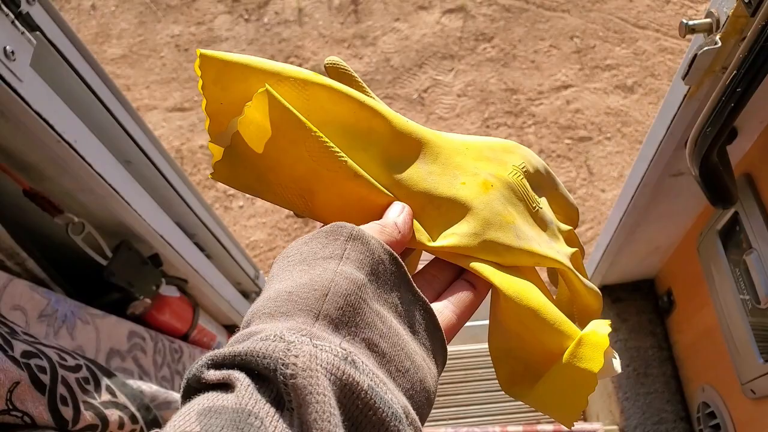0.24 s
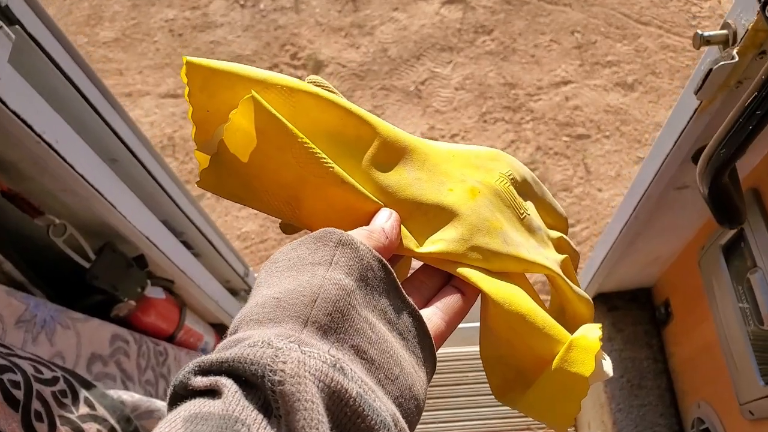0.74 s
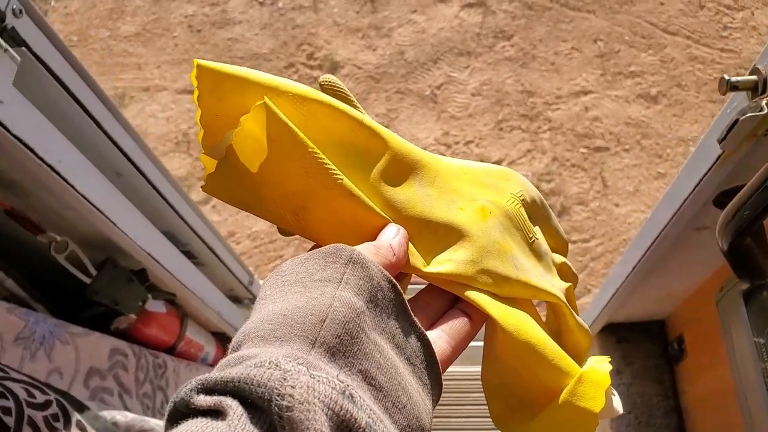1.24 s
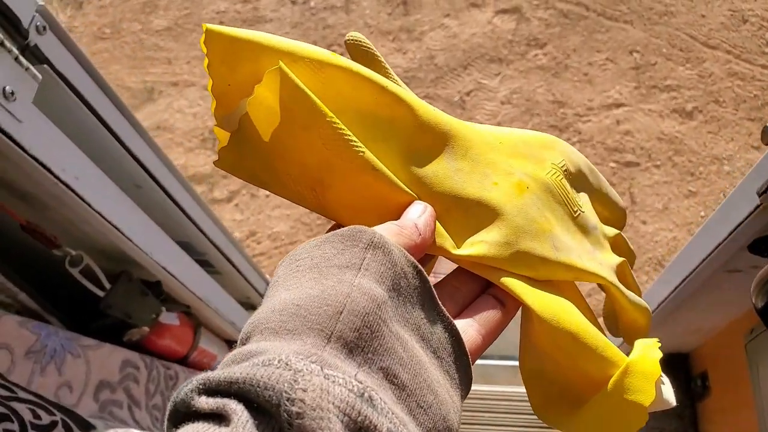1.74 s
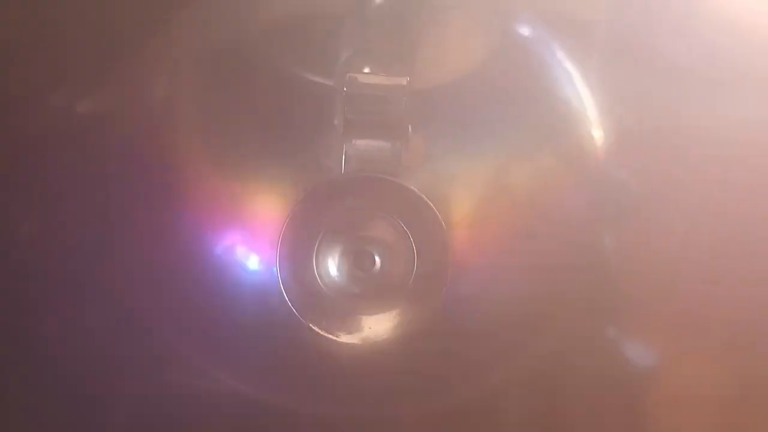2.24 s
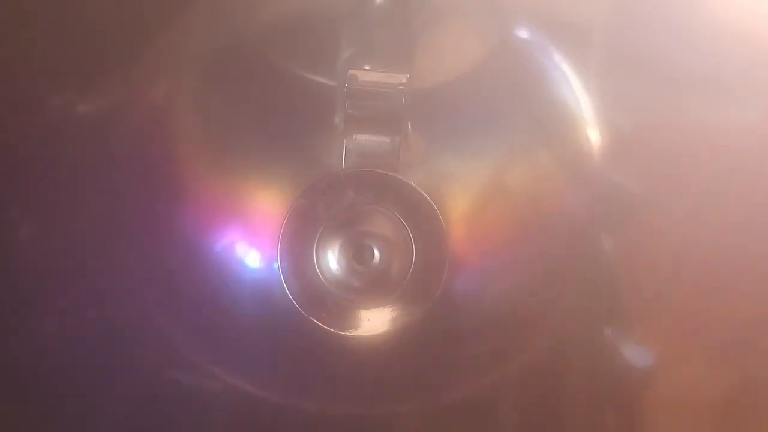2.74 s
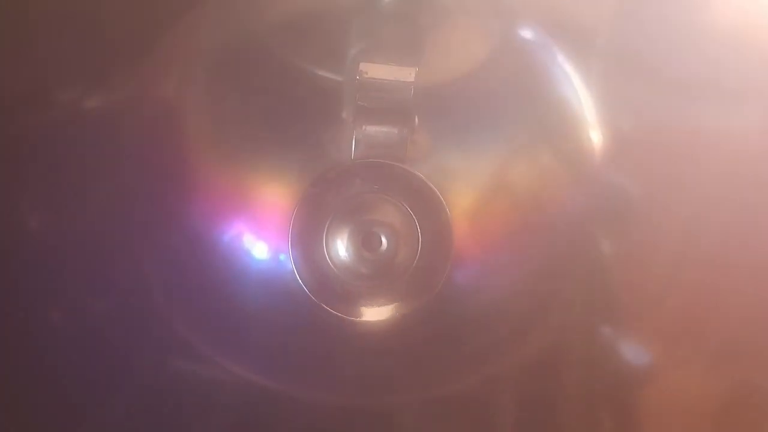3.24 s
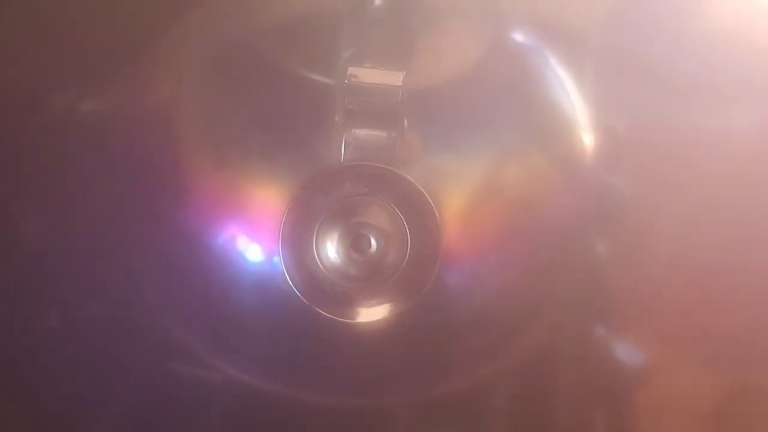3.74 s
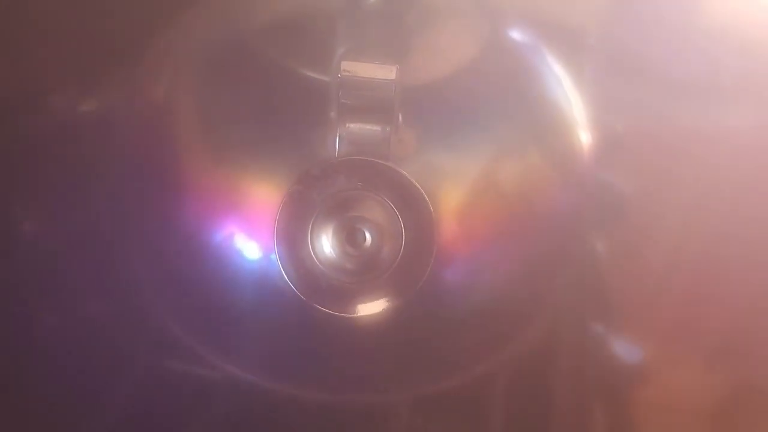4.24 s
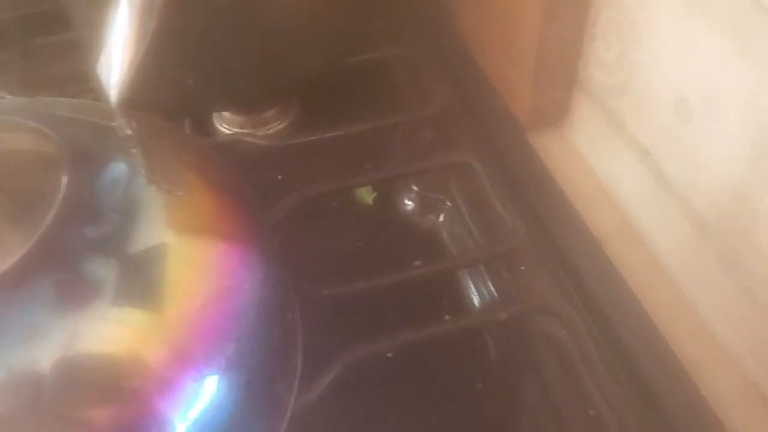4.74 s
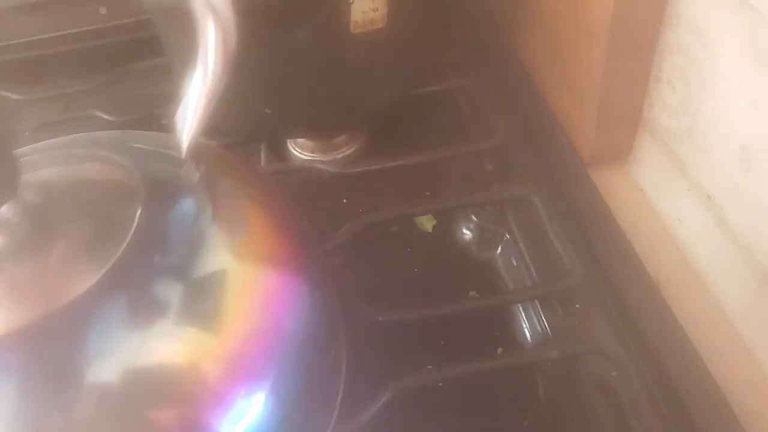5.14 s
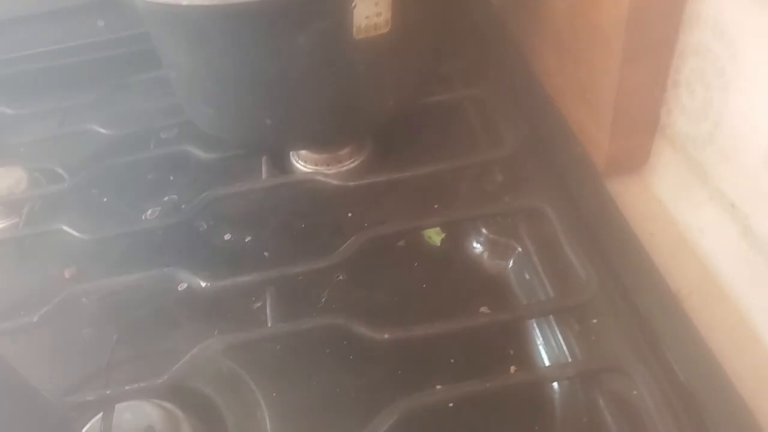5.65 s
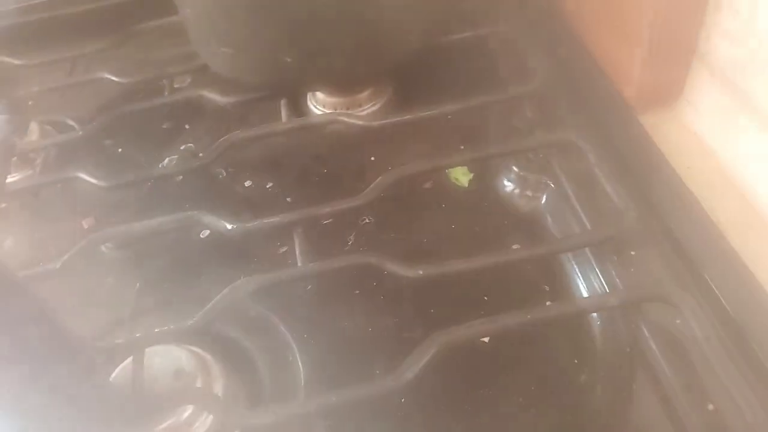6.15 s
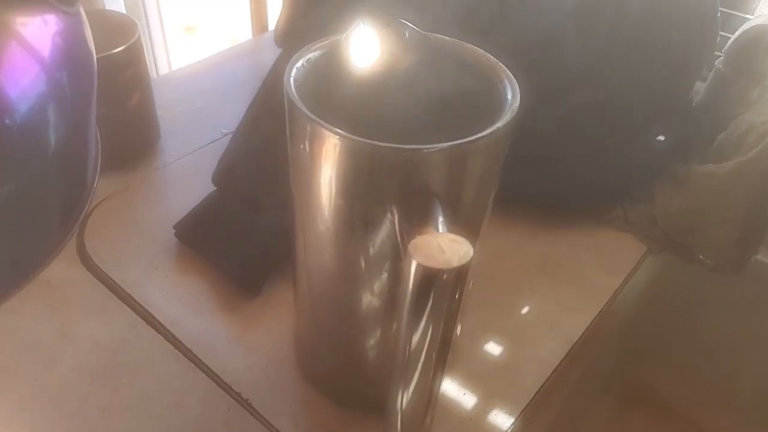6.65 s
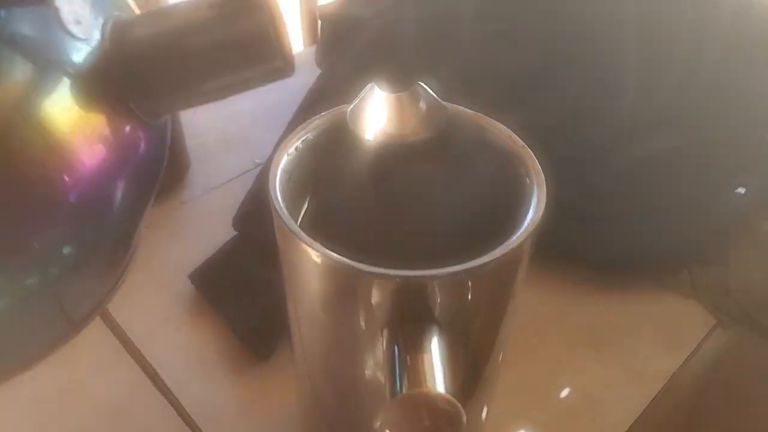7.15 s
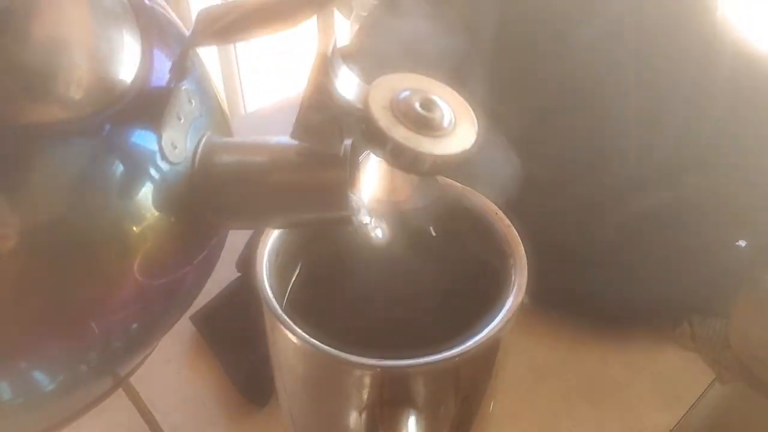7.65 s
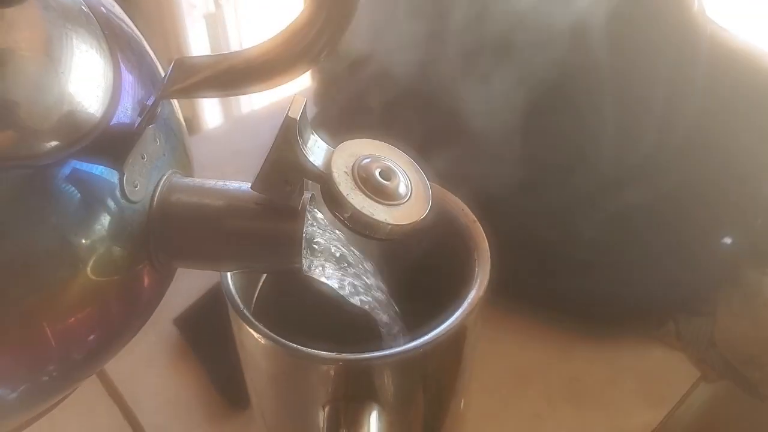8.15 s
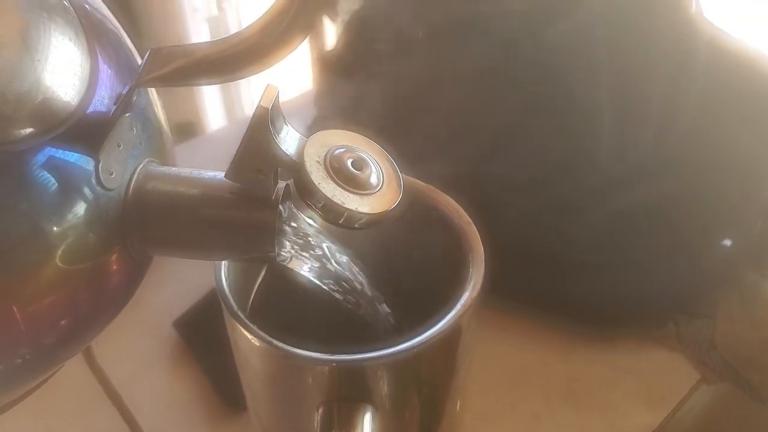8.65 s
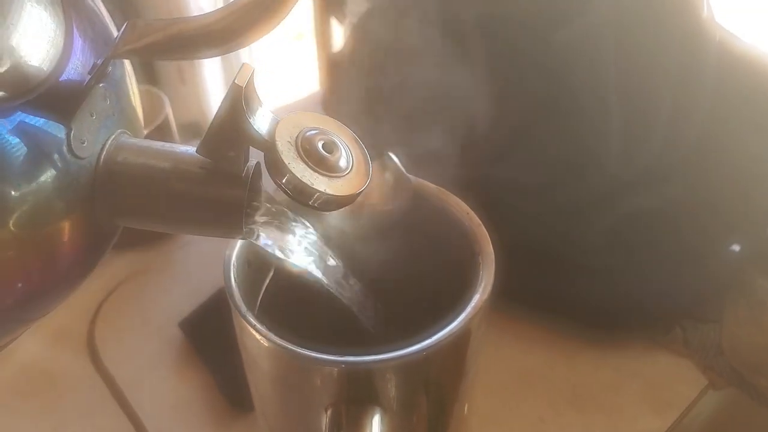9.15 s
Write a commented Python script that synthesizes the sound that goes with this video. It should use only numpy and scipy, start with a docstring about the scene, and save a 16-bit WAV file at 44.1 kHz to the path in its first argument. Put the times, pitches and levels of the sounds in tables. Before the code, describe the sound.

In a small camper kitchen, faint steam hisses over a low burner rumble, then a stovetop kettle whistles loudly, close to a stereo microphone. The bright note climbs slowly, cuts out for an instant, returns weak and drooping, then swoops as the kettle is lifted and water sloshes inside. The cap clacks, the spout hisses softly, and hot water plops into a steel mug slightly to the left, easing to a trickle.

```python
"""Faint steam hisses over a low rumble, then a kettle whistles, close to a stereo pair in a small camper kitchen.
On the gas ring, the steam jet's note climbs with the pressure, sags, then swoops as the kettle is lifted
and water sloshes on the hot metal. The cap clacks, the tipped spout hisses, and hot water plops into a
steel mug on the left. The sound breaks off twice for a moment, before and after the full whistle."""
import sys
import numpy as np
from scipy import signal
from scipy.fft import rfft, irfft, next_fast_len
from scipy.io import wavfile
from scipy.ndimage import uniform_filter1d

SR = 44100
rng = np.random.default_rng(int(sys.argv[2]) if len(sys.argv) > 2 else 0)


def store_wav(level_fs):
    """Save 16-bit WAV to argv[1]."""
    pcm = np.round(np.clip(np.atleast_2d(level_fs), -1, 1) * 32767)
    wavfile.write(sys.argv[1], SR, pcm.T.astype(np.int16))


N = 414981
T = np.arange(N) / SR
POUR_START_S = 7.95

# the whistle at full boil, climbing with the pressure: (time [s], pitch [Hz])
BOIL_PITCH = [(0.55, 2542), (0.58, 2480), (0.63, 2603), (0.83, 2599), (0.91, 2703), (1.5, 2706),
              (1.85, 2807), (2.23, 2790), (2.33, 2920), (2.94, 2992), (3.2, 3000), (3.23, 2994),
              (3.6, 3009), (4.01, 3037), (4.16, 3115), (4.42, 3068)]
# spectrum of steam rushing through the cap: (frequency [Hz], level [dB])
STEAM_HISS = [(500, -35.5), (1500, -30.5), (2400, -5.5), (4100, -5.5), (5000, 0.5), (6500, 0.5),
              (7800, -9.5), (9500, -4), (15500, -9.5)]


def amp(db):
    """Decibels to gain."""
    return 10 ** (np.asarray(db) / 20)


def unit(x):
    """Scale to rms 1."""
    return x / np.sqrt(np.mean(np.abs(x) ** 2))


def curves(table, fade=0.012):
    """A gate over the table's span, then each column at every sample."""
    s, *columns = np.transpose(table)
    gate = np.interp(T, [s[0] - fade, s[0], s[-1], s[-1] + fade], [0, 1, 1, 0])
    return [gate] + [np.interp(T, s, c) for c in columns]


def walk(rate):
    """Smooth random motion with spread 1 and about rate turns a second."""
    hold = max(int(SR / rate), 2)
    steps = np.repeat(rng.standard_normal(N // hold + 1), hold)
    return unit(uniform_filter1d(steps, hold)[:N])


def lift(x, centre, half_width, peak):
    """A bump that reaches its peak as x passes the centre."""
    return peak / (1 + ((x - centre) / half_width) ** 2)


def decay(t, t60):
    """Gain of a ring that loses 60 dB in t60."""
    return np.exp(-np.log(1000) * t / t60)


def place(events):
    """Lay (time, sound) pairs on one track."""
    out = np.zeros(N)
    for s, sound in events:
        i = int(s * SR)
        out[i:i + len(sound)] += sound[:N - i]
    return out


def pan(db):
    """Gains of the two microphones, the left louder by db."""
    return amp(np.array([[.5], [-.5]]) * db) / np.cosh(db * np.log(10) / 40)


def right_later(x, samples=8):
    """Sound from the left side reaches the right microphone a little later."""
    return np.array([x[0], np.roll(x[1], samples)])


def noise(alike=0.):
    """White noise at two microphones; alike is the share they have in common."""
    white = rng.standard_normal((3, N))
    return np.sqrt(alike) * white[2] + np.sqrt(1 - alike) * white[:2]


def filtered(x, response):
    """Pass x through a response given as a function of frequency."""
    size = next_fast_len(N + 8192, True)
    hz = np.fft.rfftfreq(size, 1 / SR) + .01
    return irfft(rfft(x, size) * response(hz), size)[..., :N]


def colour(x, points):
    """Shape x by (frequency [Hz], level [dB]) points, falling away beyond the ends; rms 1."""
    hz, db = np.transpose(points)

    def response(f):
        roll_off = 1 + (f / hz[-1] / 2) ** 2 + (hz[0] / f / 2) ** 2
        return amp(np.interp(np.log(f), np.log(hz), db)) / roll_off
    return unit(filtered(x, response))


def resonate(x, modes):
    """Ring x through (frequency [Hz], width [Hz], gain [dB]) resonances."""
    return filtered(x, lambda f: sum(amp(db) / (1 + 1j * (f * f - hz * hz) / (f * width))
                                     for hz, width, db in modes))


def cabin(x, wet_db, t60=0.099):
    """Direct sound plus the short dense echo of the camper's close walls."""
    t = T[:SR // 4]
    echo = rng.standard_normal((2, len(t))) * decay(t, t60) * (t > .002)
    echo /= np.sqrt(np.sum(echo ** 2, axis=1, keepdims=True))
    walls = signal.fftconvolve(x.mean(0)[None], echo, axes=1)[:, :N]
    return (x + amp(wet_db) * walls) / np.hypot(1, amp(wet_db))


def room_tone():
    """The kitchen's faint background air."""
    # (frequency [Hz], level [dB])
    spectrum = [(18, -38.5), (30, -16), (173, -2), (467, -18.5), (787, -8), (1550, -23), (5040, -14.5),
                (7460, -20.5), (15500, -25)]
    return colour(noise(alike=0.33), spectrum) * amp(-68)


def slow_steam(levels, spectrum, hiss_db, spout_db, rumble_db):
    """Steam hisses through the spout without locking to a tone, over a low rumble."""
    # resonances of the capped spout and of the gush past the open cap:
    # (frequency [Hz], width [Hz], gain [dB])
    spout_modes = [(1612, 103, -0.5), (2460, 200, -10.5), (2663, 56, 4.5), (2900, 68, -7), (3500, 45, -2)]
    gush_band = [(2780, 1940, 0)]
    # the burner's rumble: (frequency [Hz], level [dB])
    burner_spectrum = [(12, -47), (20, -18), (92, 2.5), (203, -19), (359, -28), (600, -38), (780, -76),
                       (1320, -120)]
    cap_opens_s, cap_swing_s = 7.38, .22
    gate, steam_db, low_db = curves(levels)
    hiss = colour(noise(alike=0.075), spectrum) * amp(steam_db + hiss_db + 0.78 * walk(37)) * pan(-1.5)
    opened = np.interp(T, [cap_opens_s, cap_opens_s + cap_swing_s], [0, 1])
    gush = resonate(noise(alike=0.21), gush_band)
    capped = unit(resonate(gush, spout_modes)) * amp(-8 * opened)
    uncapped = unit(resonate(gush, gush_band)) * opened
    spout = (capped + uncapped) * amp(steam_db + spout_db + 1.2 * walk(30)) * pan(7.9)
    rumble = colour(noise(alike=0.98), burner_spectrum) * amp(low_db + rumble_db)
    return gate * (hiss + spout + rumble)


def simmer():
    """On the ring, the steam is still too slow to whistle."""
    # (time [s], hiss [dB], rumble [dB])
    levels = [(0, -54, -45), (0.52, -54, -49)]
    return slow_steam(levels, STEAM_HISS, hiss_db=0, spout_db=2, rumble_db=-1.5)


def jet_phase(hz, jitter):
    """Phase of the jet's oscillation: its pitch turns smoothly, shaken fast and slow by turbulence."""
    turbulence = 1 + jitter * (walk(350) + .8 * walk(45))
    return 2 * np.pi * np.cumsum(uniform_filter1d(hz, size=600) * turbulence) / SR


def partial(phase, db, pan_db, lag, flutter_db, skirt_db):
    """A fluttering line with a noisy skirt, reaching the right microphone lag radians later."""
    skirt = amp(skirt_db) * (walk(700) + 1j * walk(700))
    mics = pan(pan_db) * np.exp(-1j * lag * np.array([[0], [1]]))
    line = amp(db + flutter_db * walk(70)) * (1 + skirt) * np.exp(1j * phase)
    return np.sqrt(2) * np.real(line * mics / np.abs(mics.mean(0)))


def overtones(phase, base_db):
    """Faint partials above the whistle's octave."""
    # (multiple of the pitch, level re base_db [dB], left minus right [dB])
    harmonics = [(3, -20, -18.5), (4, -28.5, -18), (5, -46.5, -2)]
    return np.sqrt(2) * sum(amp(base_db + db + 2 * walk(90)) * np.cos(k * phase) * pan(side_db)
                            for k, db, side_db in harmonics)


def subtones(phase, tones, blur_hz):
    """An unstable jet repeats only every second or third cycle: blurred lines between the harmonics."""
    return sum(amp(db) * np.real((walk(blur_hz) + 1j * walk(blur_hz)) * np.exp(1j * k * phase))
               for k, db in tones)


def full_jet():
    """Gate, pitch and change of level at full boil: a slow climb with brief stumbles and surges."""
    # (time [s], change of pitch [Hz], change of level [dB])
    stumbles = [(.91, 0, 3), (1.15, 21.5, 1), (1.411, -15, -3), (1.9, 25.5, 0), (2.1, -22, -0.5),
                (2.52, -41, 3), (3.23, -41, -1.5), (3.76, 29.5, 1), (4.08, -11, -1), (4.155, 27, 2)]
    stumble_s = 0.037
    gate, hz = curves(BOIL_PITCH)
    stumble_hz, stumble_db = sum(np.outer(change, np.exp(-((T - s) / stumble_s) ** 2))
                                 for s, *change in stumbles)
    # the pitch hunts on its way from one steady note to the next
    hunting_hz = lift(hz, centre=2820, half_width=50, peak=20) * walk(120)
    return gate, hz + stumble_hz + hunting_hz, stumble_db


def full_whistle():
    """The jet screeches for an instant, then locks to a bright tone that climbs with the pressure."""
    # where the fundamental swells or thins: (pitch [Hz], half width [Hz], lift [dB])
    spots = [(2801, 370, 13), (3054, 17, -5)]
    # left microphone minus right: (time [s], fundamental [dB], octave [dB])
    balance = [(0.55, 10.5, 5.5), (3.02, 23, 13.5), (4.42, 5.5, 6.0)]
    # the opening screech: (multiple of the pitch, level re the fundamental [dB])
    screech_tones = [(5 / 3, -4.5), (7 / 3, -6), (8 / 3, -5.5)]
    # the rush of the jet: (frequency [Hz], level [dB])
    rush_spectrum = [(500, -22.5), (1750, -26), (2400, -7), (3000, -4), (3950, -14.5), (4200, -15.5),
                     (4550, 2.5), (5400, -4.5), (6300, -1), (7300, -9), (7900, -24.5), (8800, -8.5),
                     (10500, -21.5), (12000, -17.5), (15500, -25)]
    gate, hz, stumble_db = full_jet()
    db = -31 + sum(lift(hz, *spot) for spot in spots) + stumble_db + 0.3 * walk(14)
    octave_db = -20 + lift(hz, centre=3035, half_width=22, peak=2) + stumble_db + 0.35 * walk(15)
    _, low_pan, octave_pan = curves(balance)
    phase = jet_phase(hz, jitter=0.004)
    tone = partial(phase, db, low_pan, lag=-1.75, flutter_db=1, skirt_db=-25)
    tone += partial(2 * phase, octave_db, octave_pan, lag=0.25, flutter_db=0.83, skirt_db=-19.5)
    # the upper partials flare as the pitch passes a resonance of the cap
    flare_db = lift(hz, centre=2960, half_width=67, peak=11.5)
    tone += overtones(phase, octave_db + flare_db - 8.5)
    unsettled = np.interp(T, [.603, .62], [1, 0])
    tone += amp(db) * unsettled * subtones(phase, screech_tones, blur_hz=107.2) * pan(12)
    tone += amp(db) * subtones(phase, [(1.5, -35.5), (2.5, -31)], blur_hz=279.4) * pan(3)
    air = noise(alike=0.18)
    # the spout shades the right microphone in the lower treble
    shade_hz, shade_db = [3000, 5036, 8200, 11650], [-9, -0.5, -6.5, 3.5]
    air[1] = filtered(air[1], lambda f: amp(np.interp(f, shade_hz, shade_db)))
    rush = colour(air, rush_spectrum) * amp(-31 + 1.4 * walk(40))
    return gate * cabin(tone + rush, wet_db=-38)


def buffet():
    """The plume of steam rumbles on the left microphone, harder as the boil builds."""
    # (frequency [Hz], level [dB])
    spectrum = [(12, -35.5), (20, -6.5), (89, 3.5), (215, -12), (743, -39.5), (900, -59), (1170, -64),
                (1980, -120)]
    rise_db_per_s = 1.91
    gate, _ = curves(BOIL_PITCH)
    return gate * colour(noise(), spectrum) * amp(-45 + rise_db_per_s * T + 2.8 * walk(25)) * pan(19)


def by_flow(hz, part, reference_hz=2800):
    """Base level in dB of a part of the whistle: faster steam is both higher and louder."""
    # part: (level at the reference pitch [dB], slope [dB per octave])
    flow_laws = {"weak tone": (-36, 24), "weak octave": (-50.5, 33), "weak rush": (-65, 18),
                 "swoop tone": (-28, 5), "swoop octave": (-27, 17), "swoop rush": (-36, 19)}
    db, db_per_octave = flow_laws[part]
    return db + db_per_octave * np.log2(hz / reference_hz)


def sagging_whistle():
    """With little steam the note droops and turns husky, then picks up."""
    # (time [s], pitch [Hz])
    pitch = [(4.534, 2830), (4.67, 2781), (4.89, 2586), (5.1, 2510), (5.18, 2447), (5.245, 2570),
             (5.3, 2695), (5.4, 3250), (5.435, 3640)]
    # where the fundamental swells: (pitch [Hz], half width [Hz], lift [dB])
    spots = [(2565, 55, 9), (3060, 90, 6)]
    # the husk of the weak jet: (multiple of the pitch, relative level [dB])
    husk_tones = [(.5, -15.5), (1.5, -24), (2.5, -34)]
    gate, hz = curves(pitch)
    flow_db, octave_db = by_flow(hz, "weak tone"), by_flow(hz, "weak octave")
    db = flow_db - 3 + sum(lift(hz, *spot) for spot in spots)
    phase = jet_phase(hz, jitter=0.00364)
    tone = partial(phase, db, pan_db=-0.19, lag=1.87, flutter_db=2.7, skirt_db=-20.5)
    tone += partial(2 * phase, octave_db, pan_db=13, lag=-1.4, flutter_db=4, skirt_db=-12)
    husk = amp(flow_db + 0.8) * subtones(phase, husk_tones, blur_hz=283)
    rush = colour(noise(alike=0.092), STEAM_HISS) * amp(by_flow(hz, "weak rush") + 7.5 + walk(60))
    tone += husk + overtones(phase, octave_db - 9)
    return gate * (cabin(tone, wet_db=-4) + rush)


def kettle_water(alike):
    """The dull wash of water moving inside the kettle."""
    # (frequency [Hz], level [dB])
    spectrum = [(30, -14.5), (100, 3.5), (180, -2), (350, -5), (700, -9), (1300, -6), (2200, -7),
                (4000, -18.5), (12000, -83.5)]
    return colour(noise(alike), spectrum)


def seethe():
    """The water seethes while the kettle is near the flame."""
    db = np.interp(T, [4.45, 4.53, 5.15, 6.25, 6.4], [-120, -61, -53.5, -57.5, -120])
    return kettle_water(alike=0.54) * amp(db)


def sloshes():
    """Water breaks quickly, sizzles, then washes about more softly in the kettle's hollow body."""
    # (time [s], level [dB], sizzle re that level [dB])
    heaves = [(4.962, -45, -27), (5.187, -23, -9.5), (5.585, -20.5, -12.5), (5.656, -21.5, -29.5),
              (5.739, -34, -17)]
    # the body's resonances: (frequency [Hz], width [Hz], gain [dB])
    body_modes = [(194, 20, -10), (294, 5, -9.5), (443.6, 16, -3), (629, 16, 1.5), (1210, 60, -7)]
    t = T[:SR // 3]
    rise = 1 - np.exp(-t / 0.0024)
    surge = rise * (decay(t, t60=0.18) + amp(-15.5) * decay(t, t60=.6))
    heave = place((s, amp(db) * surge) for s, db, _ in heaves)
    sizzle = place((s, amp(db + sizzle_db) * rise * decay(t, .12)) for s, db, sizzle_db in heaves)
    water = heave * kettle_water(alike=0.33) * amp(1.4 * walk(250)) + sizzle * noise(alike=0.15)
    return water + amp(7.5) * resonate(water, body_modes)


def knocks():
    """The handled kettle gives low knocks, each starting sharp and dropping in pitch."""
    # (time [s], level [dB], final pitch [Hz])
    bumps = [(4.964, -20.5, 142), (6.313, -30.5, 215), (6.385, -31, 187), (6.414, -34, 159),
             (6.485, -32, 203), (6.525, -28.5, 262), (6.54, -23, 181)]
    t = T[:SR // 3]
    envelope = (1 - np.exp(-t / 0.0024)) * decay(t, 0.03)
    bend = 1 + 0.33 * decay(t, 0.018)
    return place((s, amp(db) * envelope * np.sin(2 * np.pi * hz * t * bend)) for s, db, hz in bumps)


def swooping_whistle():
    """Sloshed water flashes to steam: pitch, level and rush surge together, and the tone sputters."""
    # three swoops as the kettle is lifted: (time [s], pitch [Hz])
    pitch = [(5.428, 2190), (5.496, 2985), (5.544, 3260), (5.6, 2990), (5.624, 2610), (5.686, 2482),
             (5.798, 3123), (5.87, 3280), (5.98, 2822), (6.082, 3227), (6.156, 2520), (6.295, 2064)]
    # where the fundamental speaks best: (pitch [Hz], half width [Hz], lift [dB])
    spots = [(2570, 230, 8.5), (3136, 130, 10.5)]
    gate, hz = curves(pitch)
    sputter_db = 4.5 * (.8 - np.abs(walk(55)))  # water in the spout chokes the tone in quick dips
    overshoot_db = lift(T, centre=5.452, half_width=0.014, peak=5.9)  # the first burst of steam
    db = by_flow(hz, "swoop tone") + sum(lift(hz, *spot) for spot in spots)
    db += overshoot_db + .5 * sputter_db
    octave_db = by_flow(hz, "swoop octave") + sputter_db
    phase = jet_phase(hz, jitter=0.0043)
    tone = partial(phase, db, pan_db=7, lag=1, flutter_db=1.4, skirt_db=-17)
    tone += partial(2 * phase, octave_db, pan_db=3.3, lag=-1.4, flutter_db=2, skirt_db=-10.5)
    rush = colour(noise(alike=0.039), STEAM_HISS) * amp(by_flow(hz, "swoop rush") + 6 + 1.7 * walk(60))
    tone += overtones(phase, octave_db + 9)
    return gate * (cabin(tone, wet_db=-12.5) + rush)


def cap_clacks():
    """The whistle cap clacks, and the handled kettle scrapes faintly once: each a crack of noise and a short
    ring."""
    # (time [s], level [dB]); the faint hit at 6.432 s is a light scrape of the kettle
    hits = [(6.297, -34), (6.432, -58), (6.517, -29), (6.5204, -20), (6.536, -50)]
    # the cap's ring: (frequency [Hz], level [dB], t60 [s])
    cap_modes = [(1580, -26, 0.15), (2300, -14, 0.04), (3156, 5, 0.037), (3170, -7, 0.035),
                 (3760, -11, 0.029), (6410, -11, 0.024)]
    t = T[:SR // 3]
    ring = sum(amp(db) * decay(t, t60) * np.sin(2 * np.pi * hz * t) for hz, db, t60 in cap_modes)
    rings = place((s, amp(db) * ring) for s, db in hits)
    cracks = place((s, amp(db) * decay(t, 0.043)) for s, db in hits)
    return amp(-3.5) * (rings + cracks * colour(noise(alike=0.13), STEAM_HISS))


def shuffle():
    """The kettle shifts in the hand with a low rustle."""
    # (time [s], level [dB])
    levels = [(6.31, -45), (6.365, -68), (6.42, -56), (6.49, -51.5), (6.55, -50)]
    gate, db = curves(levels)
    return gate * amp(db) * colour(noise(alike=0.85), [(70, -4), (180, 2), (420, -20.5), (700, -18.5)])


def tipped_spout():
    """Steam leaves the tipped spout and gushes as the cap swings open."""
    # (time [s], hiss [dB], rumble [dB])
    levels = [(6.57, -75, -60), (6.692, -58.5, -89), (6.836, -65, -89), (6.898, -65, -58),
              (6.996, -64, -75), (7.046, -51.5, -58), (7.234, -49.5, -56.5), (7.378, -54, -83),
              (7.554, -43.5, -45.5), (7.748, -48, -56.5), (7.94, -64, -65)]
    # the hiss: (frequency [Hz], level [dB])
    spectrum = [(300, -3), (700, -4), (1500, 0), (3200, 3), (4200, -2.5), (6000, 0), (8000, -5.5),
                (10000, -1.5), (12000, 6), (14000, 3.5), (15500, 7)]
    return slow_steam(levels, spectrum, hiss_db=6.5, spout_db=1.5, rumble_db=1.5)


def plop(deep_db, stretch, start_hz=1100, end_hz=160, fall_s=0.0096):
    """A pocket of air and vapour opens in the hot water: its note dives within milliseconds."""
    t = T[:SR // 8]
    hz = end_hz + (start_hz - end_hz) * np.exp(-t / (fall_s * stretch))
    bright = decay(t, 0.031)
    deep = amp(min(deep_db, 4) + 0.5) * (1 - np.exp(-(t / 0.006) ** 2)) * decay(t, 0.051)
    return (bright + deep) * np.sin(2 * np.pi * np.cumsum(hz) / SR)


def settling(part, peak_s=POUR_START_S, rise_s=.05):
    """Gain of one sound of the stream, dying down from its peak as the mug fills."""
    # part: (top level [dB], fall [dB per s])
    fades = {"column": (-57.5, 12), "splash": (-54, 26), "gurgle": (-55, 24), "droplets": (-49, 11)}
    db, db_per_s = fades[part]
    onset = np.interp(T, [POUR_START_S - rise_s, POUR_START_S], [0, 1])
    return onset * amp(db - db_per_s * np.abs(T - peak_s))


def pour():
    """Gulps plop and spatter in the mug, then the stream steadies to a soft trickle in its air column."""
    # hot water landing: (time [s], level [dB], deep part re that level [dB])
    gulps = [(7.952, -42.5, -14), (7.988, -38, -23), (8.007, -38.5, 2.5), (8.063, -36, -4),
             (8.131, -41, -8), (8.155, -38, -8), (8.317, -35, -2), (8.403, -36.5, 3.5), (8.446, -40, -11),
             (8.541, -43, 1.5), (8.555, -48.5, -15.5), (8.824, -51, -16.5), (9, -50.5, -24.5)]
    # loud spatter on the steel: (time [s], level [dB])
    splats = [(8.1556, -44), (8.2734, -40), (8.323, -36), (8.353, -44)]
    # the air in the mug: (frequency [Hz], width [Hz], gain [dB])
    mug_modes = [(756, 84, 6.5), (2540, 110, -1)]
    # the splashing: (frequency [Hz], level [dB])
    splash_spectrum = [(590, -30), (1000, -2), (1580, -9), (2160, -0.5), (2840, -10), (3960, -8.5),
                       (7790, -16.5), (15500, -20)]
    droplets_per_s, trickle_per_s = 15, 240
    t = T[:SR // 4]
    stretches = np.exp(0.2 * rng.standard_normal(len(gulps)))
    plops = place((s, amp(db - 3) * plop(deep_db, k)) for (s, db, deep_db), k in zip(gulps, stretches))
    # the deeper a gulp plunges, the more it churns the water
    swell = (1 - np.exp(-t / 0.0049)) * decay(t, 0.23)
    plunge = place((s, amp(db + deep_db - 5) * swell) for s, db, deep_db in gulps)
    churn = plunge * colour(noise(alike=1), [(50, 2.5), (180, 5.5), (600, -19)])
    gulp_spray = [(s, db - 9) for s, db, _ in gulps]
    spatter = place((s, amp(db) * decay(t, 0.042)) for s, db in splats + gulp_spray)
    # small droplets fall at random, each a tiny plop with a tick of spray
    droplets = (rng.random(N) < droplets_per_s / SR) * rng.uniform(0.34, 1, N) * settling("droplets")
    plops += signal.fftconvolve(droplets, plop(deep_db=-20, stretch=1.17))[:N]
    spatter += signal.fftconvolve(droplets, amp(-13) * decay(t, 0.028))[:N]
    trickle = (rng.random(N) < trickle_per_s / SR) * rng.standard_normal(N)
    column = unit(resonate(trickle + 0.015 * noise(alike=1), mug_modes)) * settling("column")
    splash = colour(noise(alike=0.17), splash_spectrum)
    splash *= spatter + settling("splash") * amp(3.2 * walk(120))
    # the stream gurgles most once there is water to plunge into
    gurgle = unit(resonate(noise(alike=0.96), [(177.4, 17, 0)]))
    gurgle *= settling("gurgle", peak_s=8.5) * amp(4.6 * walk(25))
    ringing = column + resonate(plops, mug_modes)
    mug = plops + churn + ringing * pan(15) + splash * pan(3.68) + gurgle
    return cabin(right_later(mug), wet_db=-8)


def scene():
    """Kettle, mug and room at the two microphones, with two short silences."""
    # (from [s], to [s])
    silences = [(0.522, 0.549), (4.423, 4.533)]
    whistle = full_whistle() + sagging_whistle() + swooping_whistle()
    steam = right_later(simmer() + tipped_spout())
    bed = seethe() + room_tone() + buffet()
    handling = cabin(sloshes() + knocks() + cap_clacks() + shuffle(), wet_db=-8)
    sounding = 1. - sum((T > start) & (T < end) for start, end in silences)
    return (whistle + steam + bed + handling + pour()) * uniform_filter1d(sounding, size=64)


def record(dry):
    """The loudest peaks are softly rounded, and the recorder cuts the top."""
    ceiling, top_hz = .78, 15850
    rounded = dry / (1 + (dry / ceiling) ** 8) ** (1 / 8)
    return signal.sosfilt(signal.ellip(10, .2, 80, top_hz, fs=SR, output="sos"), rounded)


dry = scene()
out = record(dry)
store_wav(out)
```